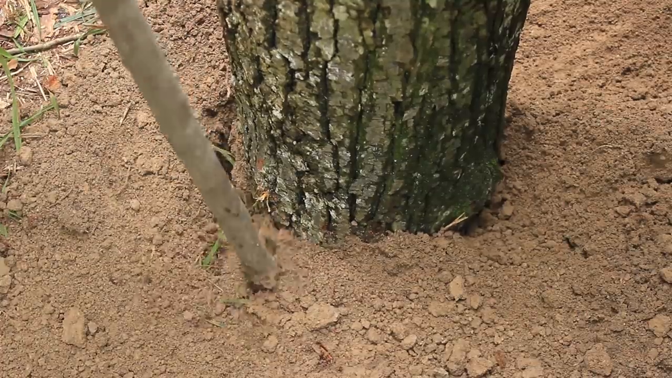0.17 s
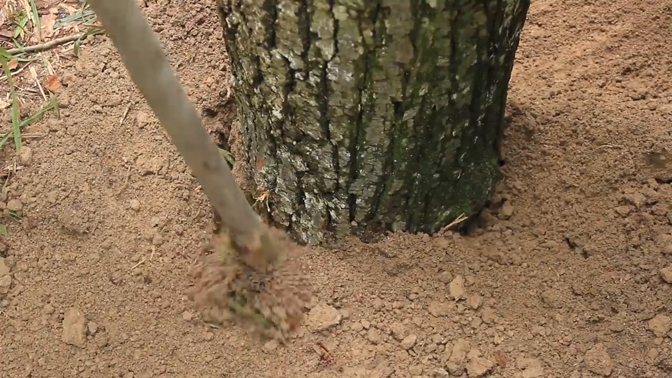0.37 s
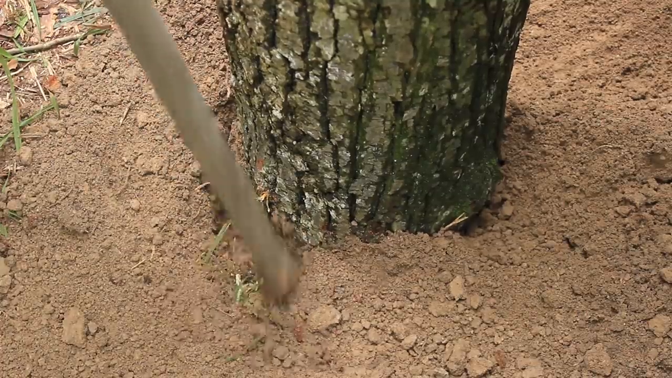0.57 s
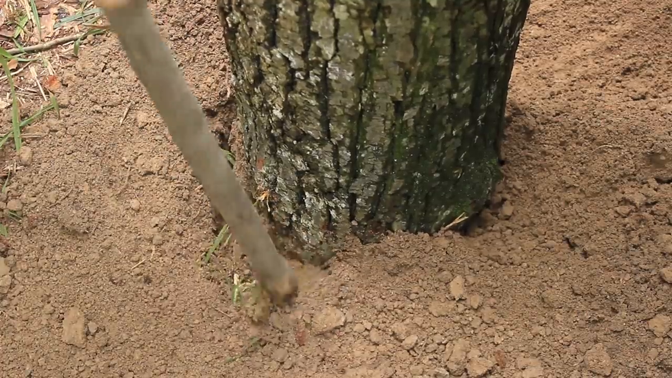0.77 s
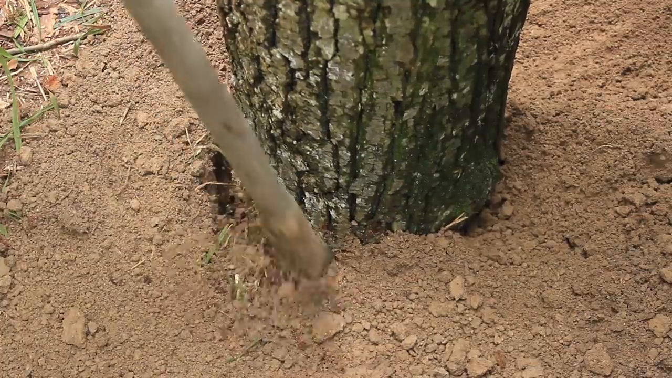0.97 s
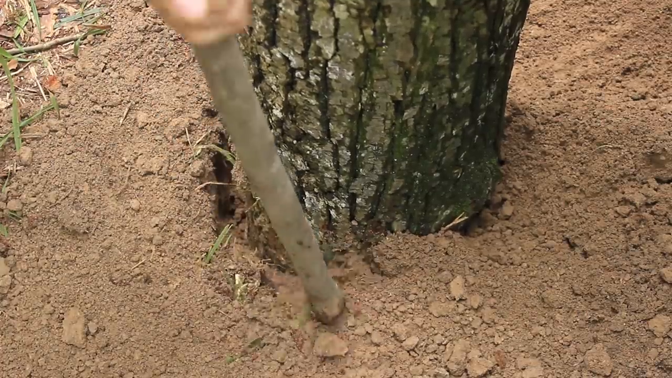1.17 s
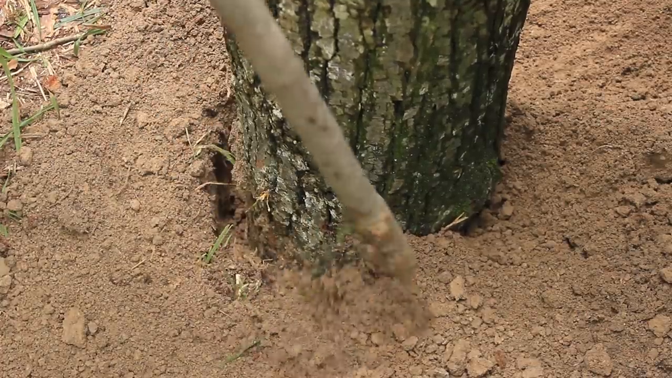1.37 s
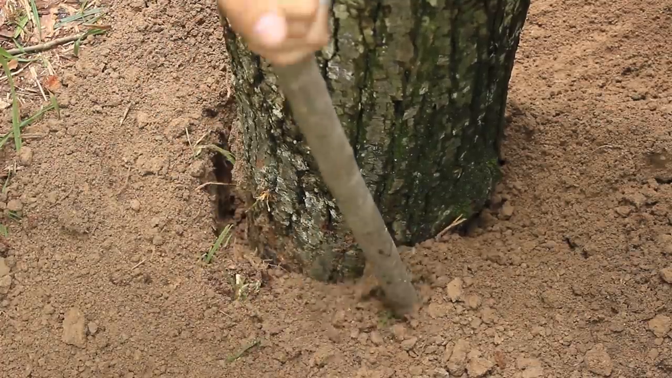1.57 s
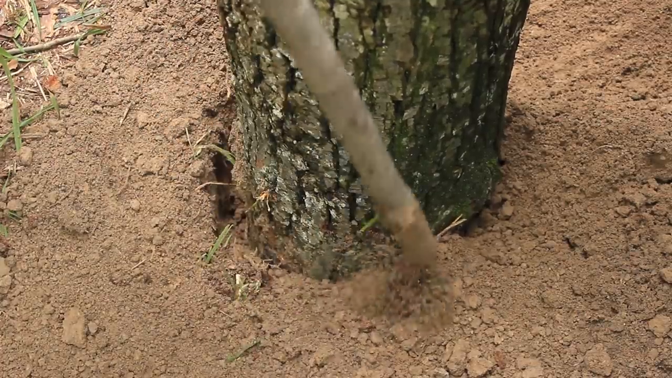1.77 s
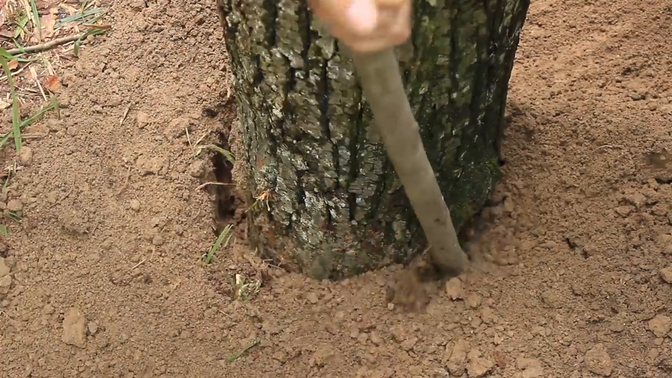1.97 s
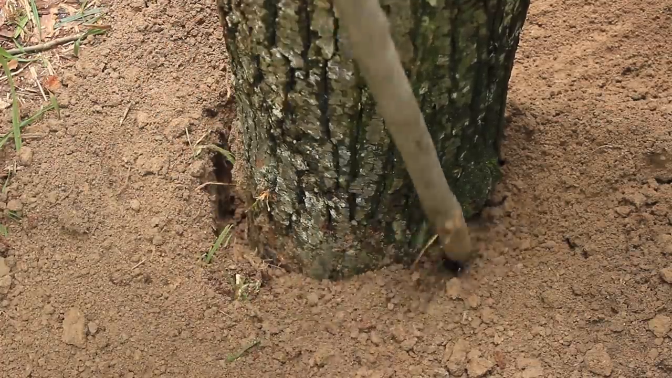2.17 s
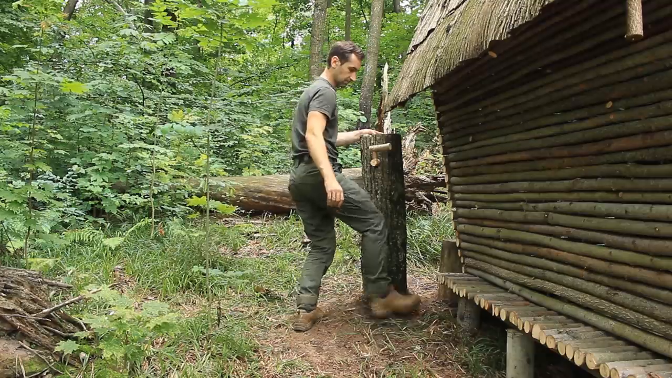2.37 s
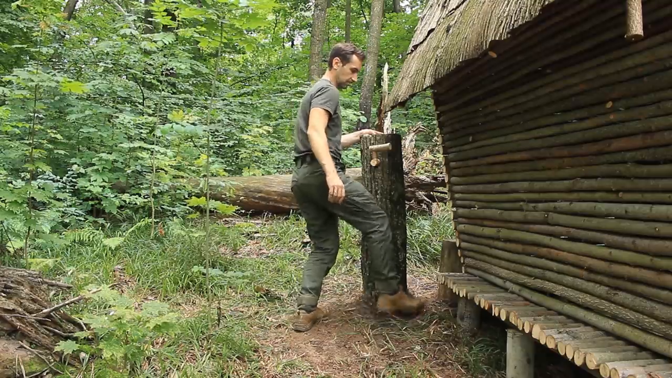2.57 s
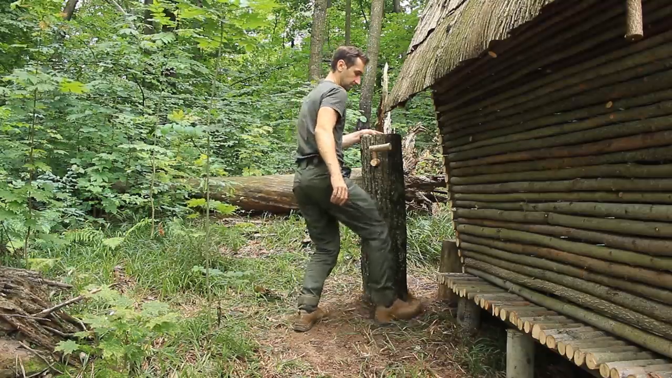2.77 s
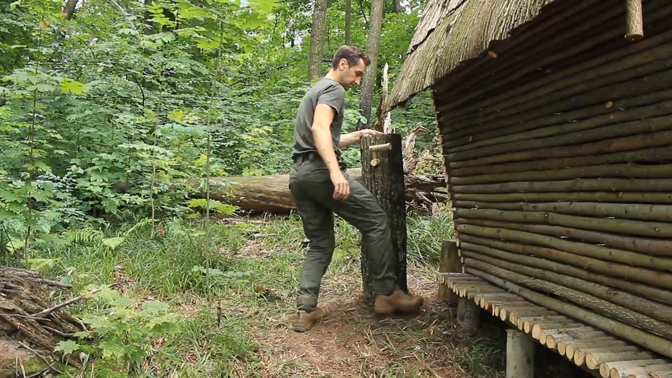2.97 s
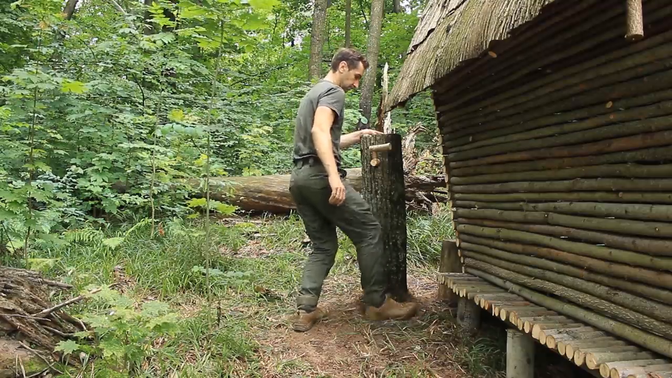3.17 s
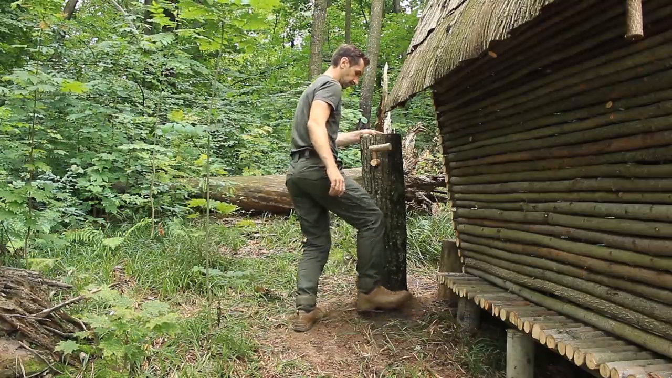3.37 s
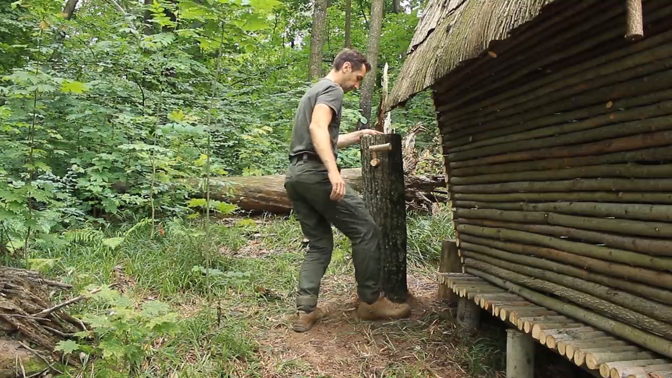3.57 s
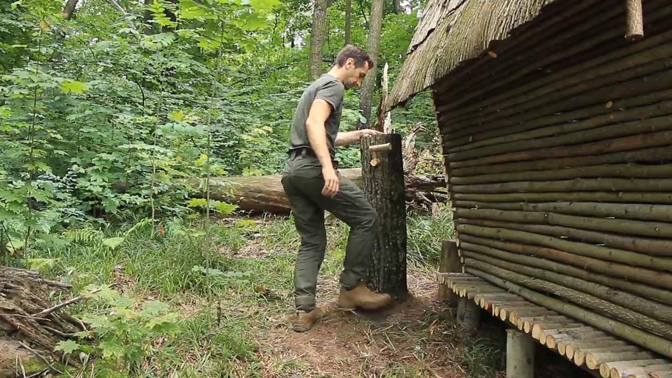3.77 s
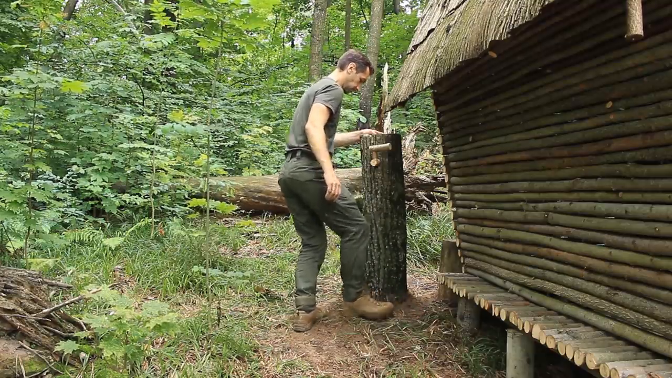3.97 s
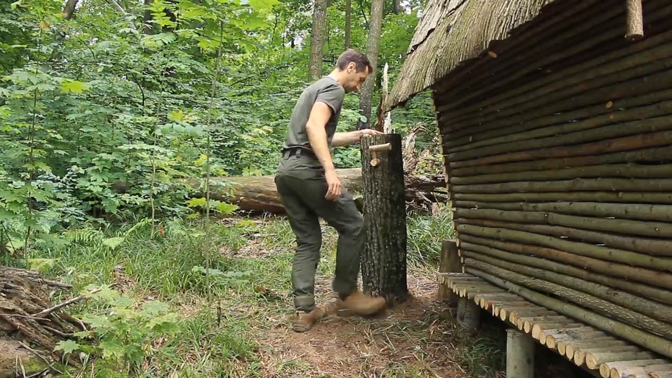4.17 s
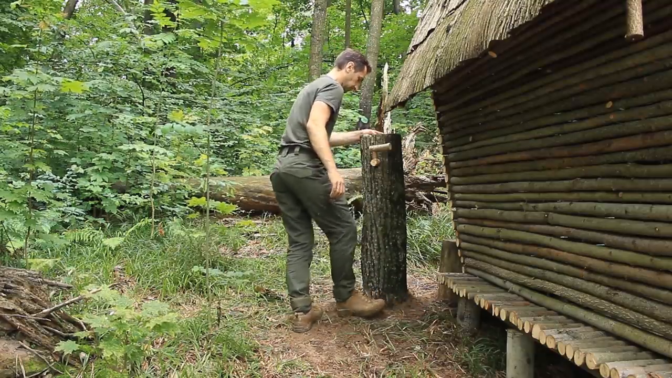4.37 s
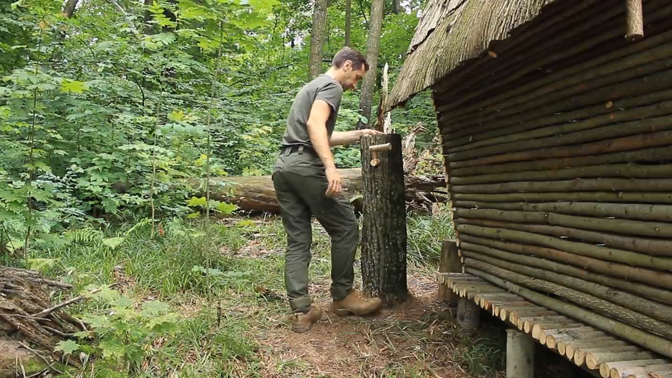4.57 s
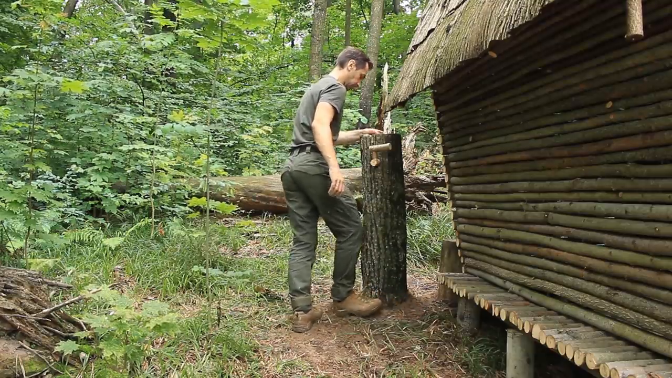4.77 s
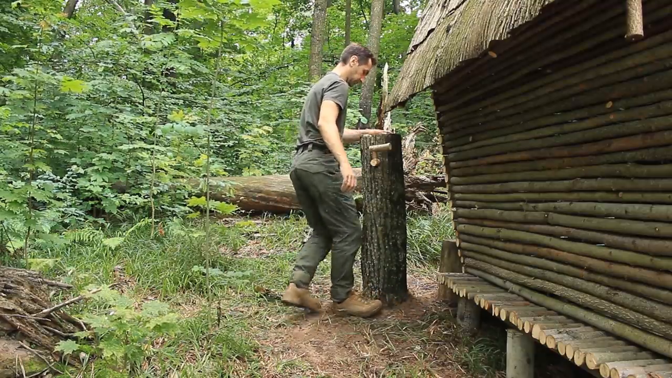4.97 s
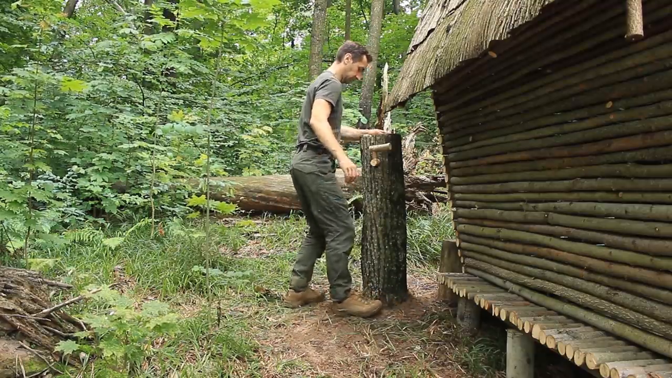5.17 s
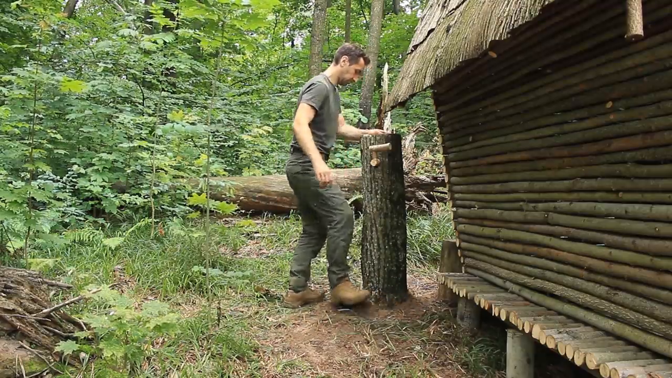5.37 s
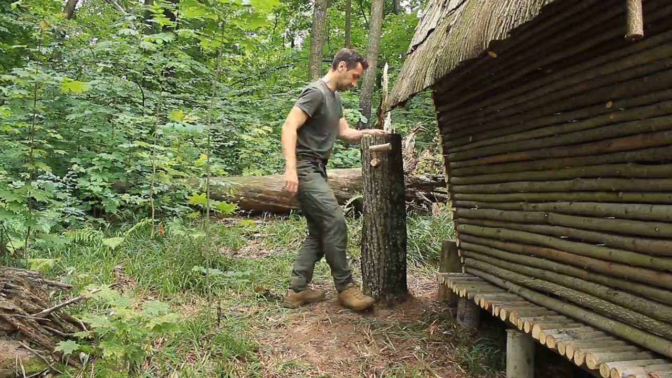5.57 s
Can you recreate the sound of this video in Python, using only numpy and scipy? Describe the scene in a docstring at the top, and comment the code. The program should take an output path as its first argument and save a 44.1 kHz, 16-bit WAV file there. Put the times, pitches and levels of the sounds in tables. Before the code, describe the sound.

A wooden pole jabs into loose earth five times, each a gritty thump with a short woody ring, and crumbs of soil patter down. Then a boot stamps the ground about eight times with dull thuds and light scuffs. As the stamping starts, a finch sings a trill, falling notes, a flourish and a buzz. Distant birds chirp and leaves hiss in the forest, all heard through one close microphone.

```python
"""A wooden pole is jabbed into loose earth round a log post, flicking soil aside; then a boot stamps
the ground firm. Soil crumbles in showers of tiny clicks, the wood rings, packed ground thumps.
A finch whistles a trill, four falling notes, a flourish and a buzz; other birds call from deep in the
forest, scattered by trunks. Leaves hiss and a few puffs of air bump the single microphone."""
import sys
import numpy as np
from scipy import signal
from scipy.fft import rfft, irfft, next_fast_len
from scipy.io import wavfile
from scipy.ndimage import uniform_filter1d

SR = 44100
rng = np.random.default_rng(int(sys.argv[2]) if len(sys.argv) > 2 else 0)


def to_wav(sig):
    """Store sig (one row per channel, or 1-D mono) as 16-bit WAV at the path in sys.argv[1].

    Samples outside -1..1 are clipped; the rate is SR.
    """
    pcm = np.clip(np.atleast_2d(sig), -1, 1) * 32767
    pcm = np.round(pcm).astype(np.int16)
    wavfile.write(sys.argv[1], SR, pcm.T)  # frames by channels


N = 247842
TIME = np.arange(N) / SR
LEAD_S = .12  # from the start of a crush to its peak load


def pole(push_db, grind_db, drag_bluntness):
    """The tip touches, packs the soil, stops hard, drags and slips; jolt and grinding ring the wood."""
    # jabs: (time [s], stopping time [s], level [dB], tilt [dB/octave], ring [dB], touch lead [s],
    # touch [dB], drag delay [s], drag [dB], slip [dB], thump [Hz], thump [dB])
    jabs = [(.262, 0.0039, -23, .3, -3, .008, -26.5, .0055, -33, -34, 150, -29),
            (.674, .0024, -17.8, 2, 0, .011, -44, .02, -24.5, -29, 488, -16),
            (1.142, .0013, -14, .8, -9, 0.032, -34.5, .009, -30.5, -45, 500, -21),
            (1.536, .002, -35, 2, -2, .002, -44, .04, -39.5, -58, 200, -55),
            (2.005, 0.0049, -26.5, -1.5, -8, .033, -32.5, .014, -28, -44, 100, -32)]
    # spectrum of crushed earth: (frequency [Hz], level [dB])
    earth = [(40, -5.5), (120, -12), (250, 0), (480, -5.5), (1000, -0.5), (2000, -2.5), (3200, -3),
             (5000, -13), (8000, -20), (15000, -33)]
    # modes of the pole: (frequency [Hz], width [Hz], gain [dB])
    modes = [(524, 23, 8), (748, 51, 0.5), (963, 40, -4.5), (1282, 30, 8), (1356, 42, 4.5), (1770, 70, -4),
             (2090, 110, 1.5), (2533, 66, 6.5), (2840, 100, -10), (3612, 43, 5)]
    out, drive = np.zeros((2, N))
    for (s, stop_s, level_db, tilt_db, ring_db, lead_s, touch_db,
         delay_s, drag_db, slip_db, thump_hz, thump_db) in jabs:
        held_db = ring_db - 3.5  # soil damps the wood once the tip is in
        # (time [s], rise [s], fall [s], bluntness, level [dB], tilt [dB/octave], ring [dB])
        touch = (s - lead_s, .0012, .009, 1, touch_db, tilt_db, ring_db)
        press = (s - stop_s, .0073, .004, 1, level_db - 16, -5, held_db)
        hit = (s, stop_s, stop_s, 1, level_db, tilt_db, ring_db)
        drag = (s + delay_s, .75 * delay_s, .41 * delay_s, drag_bluntness,
                drag_db, tilt_db - 2.3, held_db)
        slip = (s + 1.68 * delay_s, .0035, .0035, 1, slip_db, 7.5, held_db)
        for at_s, rise_s, fall_s, bluntness, db, bright_db, wood_db in (touch, press, hit, drag, slip):
            crunch = from_db(db) * crush(rise_s, fall_s, bright_db, earth,
                                         grains_per_s=22000, spread_db=2.5, bluntness=bluntness)
            add(out, at_s - LEAD_S, crunch)
            add(drive, at_s - LEAD_S, from_db(wood_db + grind_db) * crunch)
        jolt = from_db(level_db + ring_db + push_db) * signal.windows.hann(SR // 5000)
        add(drive, s, jolt)
        add(out, s - stop_s, thump(thump_hz, thump_db, swell_s=.002))
    return out + sum(from_db(db) * resonate(drive, hz, width_hz) for hz, width_hz, db in modes)


def boot():
    """The sole lands with a thump and a crunch, then scuffs as the weight rolls on to it."""
    # stamps: (time [s], rise [s], fall [s], level [dB], tilt [dB/octave], scuff [dB],
    # thump [Hz], thump [dB])
    stamps = [(2.509, 0.0029, .018, -35, -5, -44.5, 300, -27),
              (2.889, .01, .018, -37, -4.5, -44.5, 277, -41),
              (3.254, .0075, .014, -36, -1.5, -42.5, 465, -37),
              (3.594, .0065, 0.0097, -27, -0.5, -42.5, 490, -21),
              (3.929, .0035, .01, -29, -.5, -40, 300, -41),
              (4.289, .006, 0.0098, -26, 1.5, -39, 320, -21.5),
              (5.232, .005, 0.027, -41.5, .5, -56, 130, -50), (5.618, .008, 0.0091, -28, -2, -45, 470, -27)]
    # spectrum of soil under the sole: (frequency [Hz], level [dB])
    sole = [(40, -10.5), (110, -2.5), (280, -2), (500, 0), (1000, -4.5), (2000, -13), (4000, -17.5),
            (8000, -29.5), (15000, -41.5)]
    scuff_delay_s = .035
    out = np.zeros(N)
    for s, rise_s, fall_s, level_db, tilt_db, scuff_db, thump_hz, thump_db in stamps:
        landing = crush(rise_s, fall_s, tilt_db, sole, grains_per_s=12000, spread_db=2)
        scuff = crush(rise_s=.0055, fall_s=.017, tilt_db=2, spectrum=sole,
                      grains_per_s=12000, spread_db=2)
        thud = thump(hz=115, peak_db=level_db - 13, swell_s=.0063)
        add(out, s - LEAD_S, from_db(level_db) * landing)
        add(out, s + scuff_delay_s - LEAD_S, from_db(scuff_db) * scuff)
        add(out, s - rise_s, thump(thump_hz, thump_db, swell_s=.48 * rise_s) + thud)
    return out


def loose_soil(crumb_tilt_db, swish_s):
    """Flicked crumbs patter down; fine dirt slides with a faint hiss."""
    # sprays of crumbs: (time [s], rise [s], fall [s], level [dB])
    sprays = [(.235, .036, 0.098, -44), (.4, .025, .05, -43), (.858, 0.027, .017, -44.5),
              (1.288, 0.027, .026, -44.5), (1.73, .045, 0.043, -46.5), (2.2, .027, 0.035, -44)]
    # swishes of fine dirt: (time [s], level [dB])
    swishes = [(1.455, -56), (1.72, -58), (2.935, -58), (3.27, -62), (3.61, -59)]
    # their spectra: (frequency [Hz], level [dB])
    crumbs = [(60, 2), (300, 0), (1200, -0.5), (2700, 4), (5000, -6), (9000, -16), (15000, -31)]
    dust = [(1000, -20), (5000, -4), (10000, 0), (15000, -1)]
    out = np.zeros(N)
    for s, rise_s, fall_s, level_db in sprays:
        patter = crush(rise_s, fall_s, crumb_tilt_db, crumbs, grains_per_s=1800, spread_db=1.7)
        add(out, s - LEAD_S, from_db(level_db) * patter)
    for s, level_db in swishes:
        hiss = crush(swish_s, swish_s, 0, dust, grains_per_s=9000, spread_db=1)
        add(out, s - LEAD_S, from_db(level_db) * hiss)
    return out


def crush(rise_s, fall_s, tilt_db, spectrum, grains_per_s, spread_db, bluntness=1):
    """Crumbs of soil give way in a shower of tiny clicks that swells and dies with the load."""
    t = TIME[:SR // 3] - LEAD_S
    from_peak = np.abs(t / np.where(t < 0, rise_s, fall_s))
    load = np.exp(-np.minimum(from_peak ** bluntness, 60))
    breaks = rng.random(len(t)) < grains_per_s / SR
    sizes = from_db(spread_db * np.minimum(rng.exponential(1, len(t)), 4))
    clicks = load * breaks * sizes * rng.choice([-1, 1], len(t))
    return rms_one(colour(clicks, spectrum, tilt_db)) * np.sqrt(np.mean(load ** 2))


def thump(hz, peak_db, swell_s):
    """Packed ground answers a firm blow with a few heavily damped cycles."""
    t = TIME[:SR // 10]
    envelope = t / swell_s * np.exp(1 - t / swell_s)
    return from_db(peak_db) * envelope * np.sin(2 * np.pi * hz * t)


def finch():
    """Two evenly paced runs that grow louder, a flourish, and a last falling note that throbs."""
    # strokes of each syllable: (offset [s], length [s], start [Hz], middle [Hz], end [Hz],
    # level [dB], buzz depth [Hz])
    trill = [(0, .018, 5200, 5000, 4300, -41, 750), (.016, 0.0236, 3400, 2886, 3100, -46, 150),
             (.038, .022, 3400, 4450, 5500, -35.7, 270)]
    slide = [(0, .024, 5300, 4590, 4080, -39, 251), (.018, .03, 5700, 4693, 3900, -38, 743),
             (.032, .064, 4350, 2950, 1840, -31.5, 60)]
    flourish = [(0, .05, 7000, 5790, 5200, -36, 600), (.065, .065, 7400, 6210, 4920, -35.5, 855),
                (.147, .067, 3900, 3550, 1950, -29, 300), (.216, .034, 2000, 2800, 3500, -29.5, 120),
                (.236, .028, 3500, 3003, 1750, -27.5, 110)]
    buzz = [(0, .215, 5000, 3400, 1750, -30, 363)]
    trill_at_s, trill_every_s, trill_step_db = 2.275, .0762, .3
    slide_at_s, slide_every_s, slide_step_db = 2.677, .144, 1.24
    flourish_at_s, buzz_at_s = 3.259, 3.588
    out = np.zeros(N)
    for k in range(5):
        note = syllable(trill, buzz_rate_hz=230, unsteady=.71, swell_power=.76)
        add(out, trill_at_s + k * trill_every_s, from_db(k * trill_step_db) * note)
    for k in range(4):
        note = syllable(slide, buzz_rate_hz=220, unsteady=.57, swell_power=.94)
        add(out, slide_at_s + k * slide_every_s, from_db(k * slide_step_db) * note)
    add(out, flourish_at_s, syllable(flourish, buzz_rate_hz=220, unsteady=.486, swell_power=.79))
    add(out, buzz_at_s, syllable(buzz, buzz_rate_hz=51, unsteady=.82, swell_power=1.05))
    return out


def syllable(strokes, buzz_rate_hz, unsteady, swell_power):
    """Each stroke arcs through three pitches, swelling and fading; the voice weakens on low notes."""
    throat_low_hz, loss_db_per_octave = 2840, 12
    out = np.zeros(SR // 2)
    for s, length_s, start_hz, middle_hz, end_hz, level_db, buzz_hz in strokes:
        u = np.linspace(0, 1, int(length_s * SR))
        hz = np.polyval(np.polyfit([0, .5, 1], [start_hz, middle_hz, end_hz], 2), u)
        swell = np.abs(np.sin(np.pi * u)) ** swell_power
        throat_db = loss_db_per_octave * np.minimum(np.log2(hz / throat_low_hz), 0)
        add(out, s, whistle(hz, swell * from_db(level_db + throat_db), buzz_hz, buzz_rate_hz, unsteady))
    return out


def whistle(hz, gain, buzz_hz, buzz_rate_hz, unsteady):
    """A bird's near-pure tone; a fast flutter of the syrinx swings its pitch."""
    flutter = np.sin(2 * np.pi * buzz_rate_hz * TIME[:len(hz)]) + unsteady * wander(len(hz), per_s=700)
    return np.sqrt(2) * gain * np.sin(2 * np.pi * np.cumsum(hz + buzz_hz * flutter) / SR)


def far_birds(chip_direct_db, call_direct_db):
    """Chips, rasps and whistles arrive direct and scattered by trees; the chips are the clearest."""
    # quick high chips: (time [s], start [Hz], end [Hz], level [dB])
    chip_notes = [(1.42, 7600, 8500, -57), (1.947, 6770, 8070, -51.5), (2.178, 6780, 8300, -48.5),
                  (2.546, 7160, 8100, -47.5), (2.548, 8500, 9300, -58), (2.755, 7530, 8650, -57),
                  (5.113, 9280, 6900, -55), (5.365, 8450, 9300, -62), (5.405, 3610, 4800, -52)]
    # rasping calls: (time [s], length [s], pitch [Hz], level [dB])
    rasps = [(.05, .13, 7650, -62), (1.524, .14, 7450, -56), (2.456, .13, 7560, -60),
             (2.87, 0.086, 7040, -53.5), (3.547, .1, 6980, -52), (4.181, .14, 7250, -48.5),
             (4.495, .09, 6750, -58), (5.182, .15, 7260, -48.5)]
    # soft low whistles: (time [s], length [s], start [Hz], end [Hz], level [dB])
    whistles = [(.09, .088, 2275, 2390, -49.5), (.141, .13, 2673, 3050, -48.5),
                (1.384, .25, 3175, 3220, -51), (4.486, 0.057, 2546, 2560, -56.5),
                (4.674, .18, 2486, 3000, -58), (4.77, 0.23, 2990, 2923, -56.5),
                (5.199, 0.2, 2823, 2740, -58)]
    chip_s, sag_hz = .036, 221
    chips, calls = np.zeros((2, N))
    for s, start_hz, end_hz, level_db in chip_notes:
        add(chips, s, glide(chip_s, start_hz, end_hz, level_db, buzz_hz=90, unsteady=.4))
    for s, length_s, hz, level_db in rasps:
        rasp = glide(length_s, hz + sag_hz / 2, hz - sag_hz / 2, level_db, buzz_hz=650, unsteady=.33)
        add(calls, s, rasp)
    for s, length_s, start_hz, end_hz, level_db in whistles:
        add(calls, s, glide(length_s, start_hz, end_hz, level_db, buzz_hz=90, unsteady=1.3))
    scattered = forest(from_db(-2) * chips + calls, t60_s=.82, early_s=.017, early_db=.5)
    return from_db(chip_direct_db) * chips + from_db(call_direct_db) * calls + scattered


def glide(length_s, start_hz, end_hz, level_db, buzz_hz, unsteady):
    """A far bird's call: one straight glide with soft ends."""
    swell = signal.windows.tukey(int(length_s * SR), .5)
    hz = np.linspace(start_hz, end_hz, len(swell))
    return whistle(hz, swell * from_db(level_db), buzz_hz, buzz_rate_hz=95, unsteady=unsteady)


def forest(x, t60_s, early_s, early_db):
    """Trunks scatter the sound: a quick cluster from nearby wood, then a long thin tail."""
    t = TIME[:SR]
    decay = from_db(-60 * t / t60_s) + from_db(early_db) * np.exp(-t / early_s)
    echoes = rng.standard_normal(SR) * decay * (t > .003)
    return signal.fftconvolve(x, rms_one(echoes) / np.sqrt(SR))[:N]


def through_leaves(x, clear_hz):
    """Foliage lets only the lower notes through on the straight path."""
    return butterworth(x, 3, clear_hz, "low")


def puffs(puff_half_s, bass_cut_hz):
    """Each large eddy pulls at the microphone, then pushes it; small ones tumble along in the gusts."""
    # large eddies: (time [s], pressure [dB])
    large_eddies = [(.842, -29.5), (1.164, -33.5), (1.333, -32), (1.361, -29), (1.46, -26.5),
                    (1.485, -24.5), (1.506, -31.5)]
    # gusts of small eddies: (time [s], half length [s], level [dB])
    gusts = [(.83, 0.059, -45), (1.374, 0.12, -46), (1.68, 0.11, -52.5)]
    gusting = sum(from_db(db) * np.exp(-((TIME - s) / half_s) ** 2) for s, half_s, db in gusts)
    out = gusting * noise_band(hz=48, width_hz=60)
    u = np.arange(-3, 3, 1 / (puff_half_s * SR))
    for s, db in large_eddies:
        add(out, s - 3 * puff_half_s, 2 * from_db(db) * u * np.exp(-u * u))
    return butterworth(out, 2, bass_cut_hz, "high")  # the microphone sheds the deepest part


def air(rustle_db, hiss_db, split_hz, lowest_hz, near_until_s):
    """Forest air: a low rustle, the hiss of leaves and a rumble that comes and goes."""
    # spectrum of the leaves: (frequency [Hz], level [dB])
    leaves = [(15, -35), (25, 5), (133, -6), (313, -12.5), (340, -12), (509, -15.5), (598, -16.5),
              (1570, -20.5), (2920, -20), (3830, -23), (7100, -28), (8130, -31), (15500, -32.5)]
    # distant rumble of the breeze: (time [s], level [dB])
    rumble_curve = [(0, -80), (.7, -63), (1.4, -49), (2.0, -61), (2.3, -51), (3.2, -62), (4.3, -54.5),
                    (5.0, -50.5), (5.62, -50.5)]
    # a little louder down at the foot of the post
    near = uniform_filter1d(1.0 * (TIME < near_until_s), SR // 10)
    noise = rms_one(colour(rng.standard_normal(N), leaves))
    noise = butterworth(noise, 1, lowest_hz, "high")
    low = butterworth(noise, 1, split_hz, "low")
    rustle = low * from_db(rustle_db + 2.5 * near)
    hiss = (noise - low) * from_db(hiss_db + 1.4 * near)
    rumble_db = np.interp(TIME, *np.transpose(rumble_curve))
    return rustle + hiss + from_db(rumble_db) * noise_band(hz=84.4, width_hz=99)


def from_db(db):
    """Decibels to gain."""
    return 10 ** (np.asarray(db) / 20)


def rms_one(x):
    """Scale to unit power."""
    return x / np.sqrt(np.mean(x ** 2) + 1e-20)


def add(out, s, sound):
    """Mix a sound in from time s."""
    at = max(round(s * SR), 0)
    out[at:at + len(sound)] += sound[:max(N - at, 0)]


def colour(x, spectrum, tilt_db=0):
    """Minimum-phase filter with the given spectrum, tilted by tilt_db per octave above 200 Hz."""
    size = 2 * next_fast_len(len(x))
    octave = np.log2(np.maximum(np.arange(size // 2 + 1) * SR / size, 10))
    hz, db = np.transpose(spectrum)
    shape_db = np.interp(octave, np.log2(hz), db) + tilt_db * np.maximum(octave, np.log2(200))
    cepstrum = irfft(np.log(from_db(shape_db - shape_db.max())))
    cepstrum[1:size // 2] *= 2
    cepstrum[size // 2 + 1:] = 0
    return irfft(rfft(x, size) * np.exp(rfft(cepstrum)))[:len(x)]


def butterworth(x, order, hz, kind):
    """Causal low- or high-pass."""
    return signal.sosfilt(signal.butter(order, hz, kind, fs=SR, output="sos"), x)


def resonate(x, hz, width_hz):
    """One resonance, gain 1 at its top."""
    r = np.exp(-np.pi * width_hz / SR)
    feedback = [1, -2 * r * np.cos(2 * np.pi * hz / SR), r * r]
    return signal.lfilter(np.array([1, 0, -1]) * (1 - r * r) / 2, feedback, x)


def noise_band(hz, width_hz):
    """Unit-power noise, passed twice through one resonance."""
    return rms_one(resonate(resonate(rng.standard_normal(N), hz, width_hz), hz, width_hz))


def wander(count, per_s):
    """Random curve through per_s normal draws a second."""
    steps = np.arange(count) * per_s / SR
    return np.interp(steps, np.arange(4000), rng.standard_normal(4000))


def scene():
    """Work close by, birds among the trees; one microphone feeds both channels."""
    work = pole(push_db=9, grind_db=0, drag_bluntness=2.2) + boot()
    work += loose_soil(crumb_tilt_db=-.6, swish_s=.04)
    work += from_db(-16) * forest(work, t60_s=.57, early_s=.0087, early_db=24)
    song = finch()
    scattered = forest(song, t60_s=.75, early_s=.0085, early_db=6)
    song = from_db(-2.5) * through_leaves(song, clear_hz=4320) + from_db(-3) * scattered
    calls = far_birds(chip_direct_db=-3.5, call_direct_db=-5)
    breeze = air(rustle_db=-47, hiss_db=-49, split_hz=3800, lowest_hz=237, near_until_s=2.25)
    mix = work + song + calls + puffs(puff_half_s=.0037, bass_cut_hz=26) + breeze
    return np.array([mix, mix])


def record(dry):
    """Steep low-pass on the top treble."""
    cutoff_hz = 15900
    return signal.sosfilt(signal.ellip(12, .1, 70, cutoff_hz, fs=SR, output="sos"), dry)


dry = scene()
out = record(dry)
to_wav(out)
```